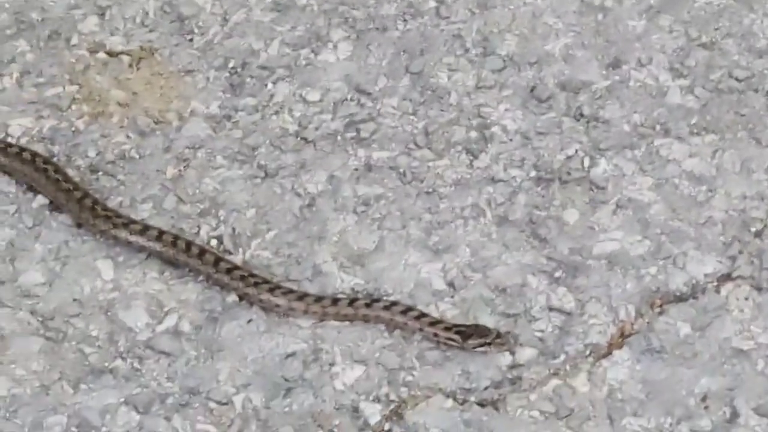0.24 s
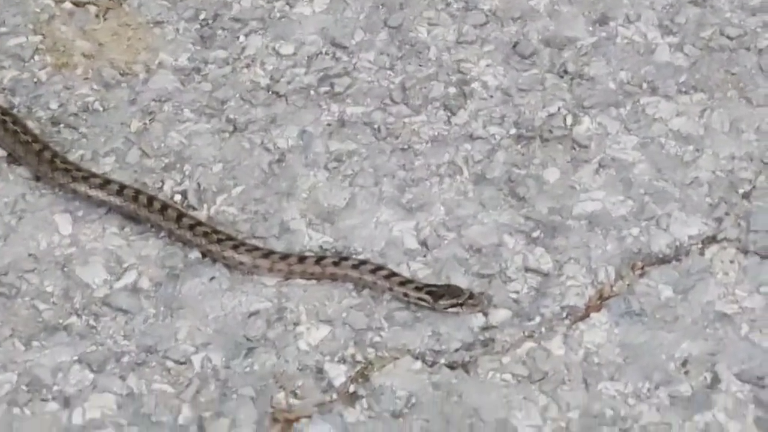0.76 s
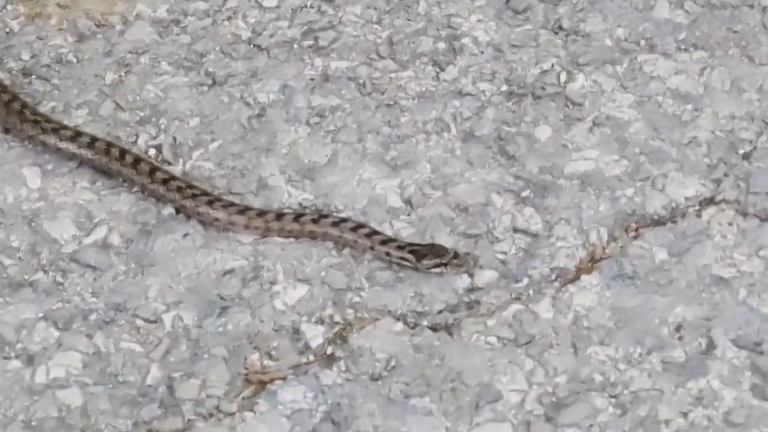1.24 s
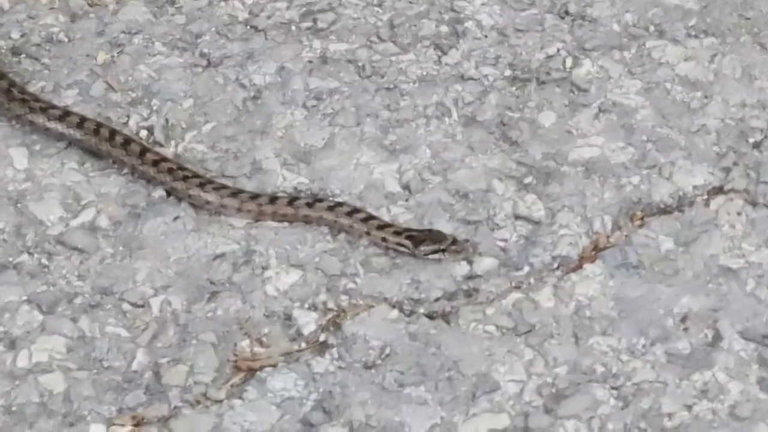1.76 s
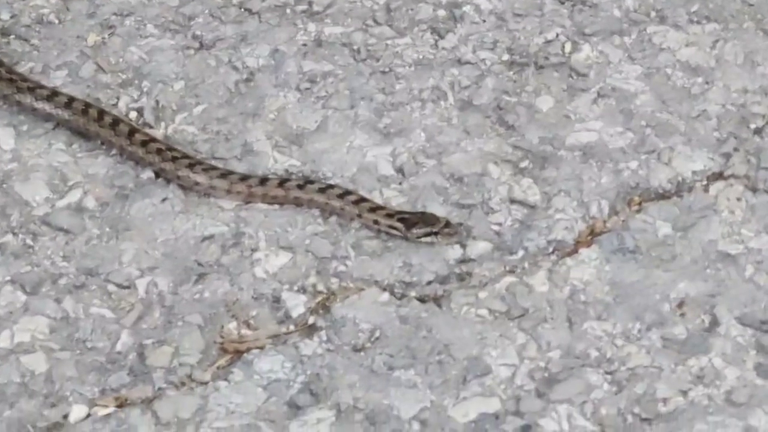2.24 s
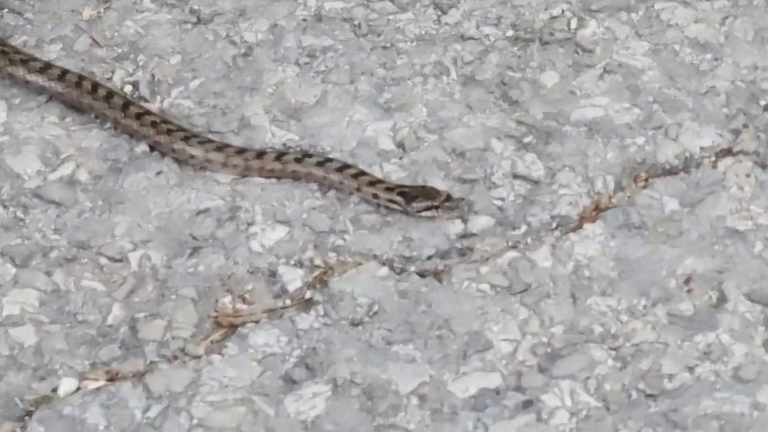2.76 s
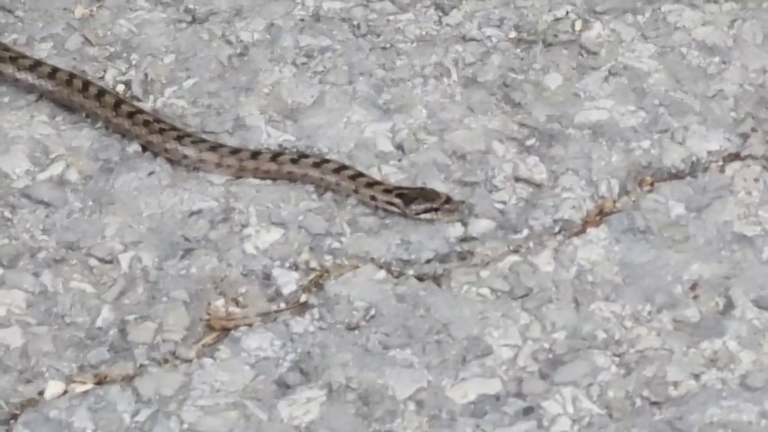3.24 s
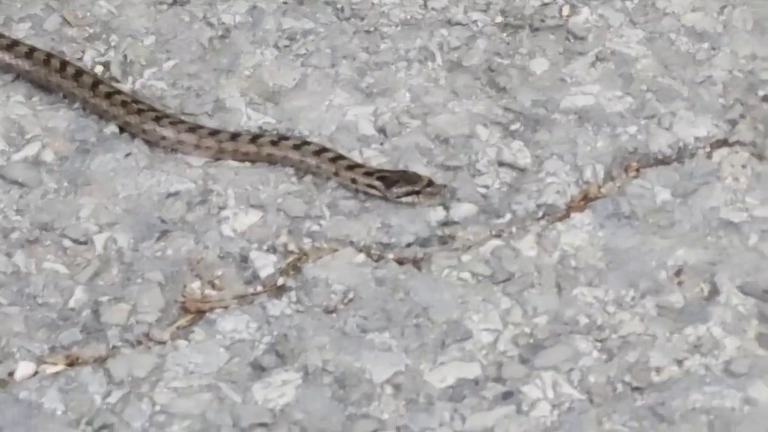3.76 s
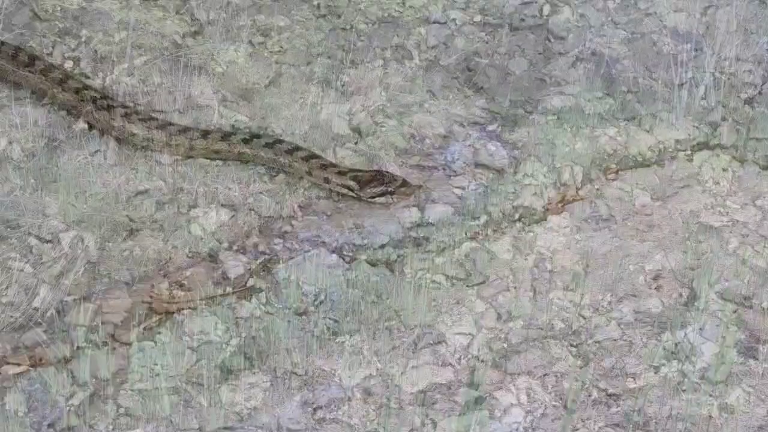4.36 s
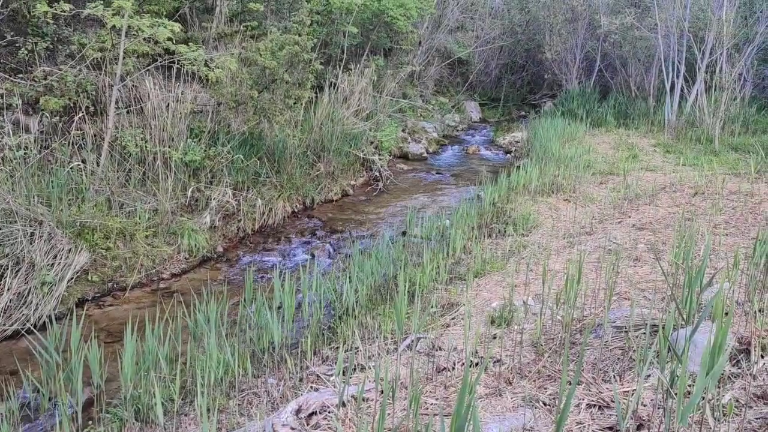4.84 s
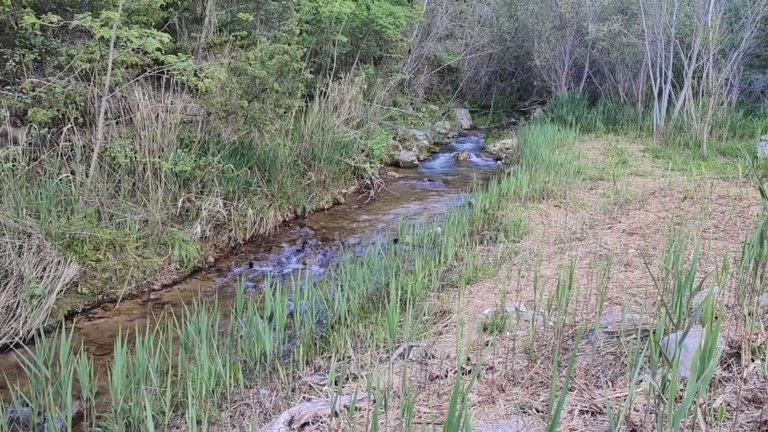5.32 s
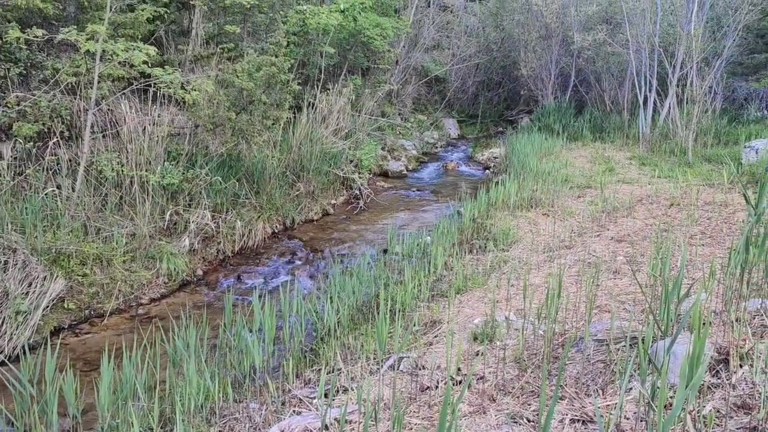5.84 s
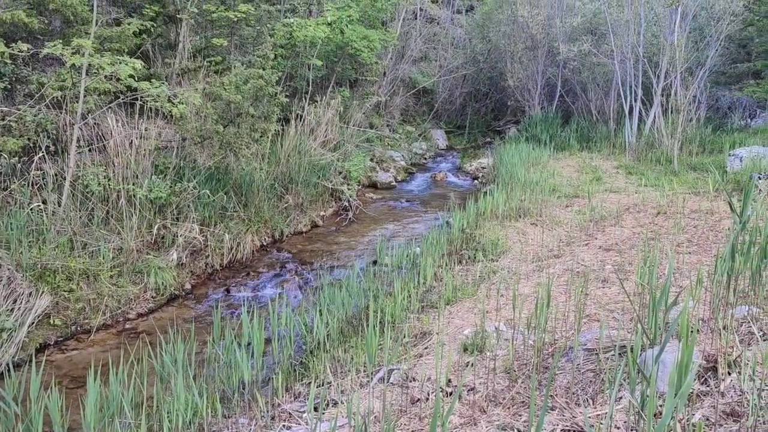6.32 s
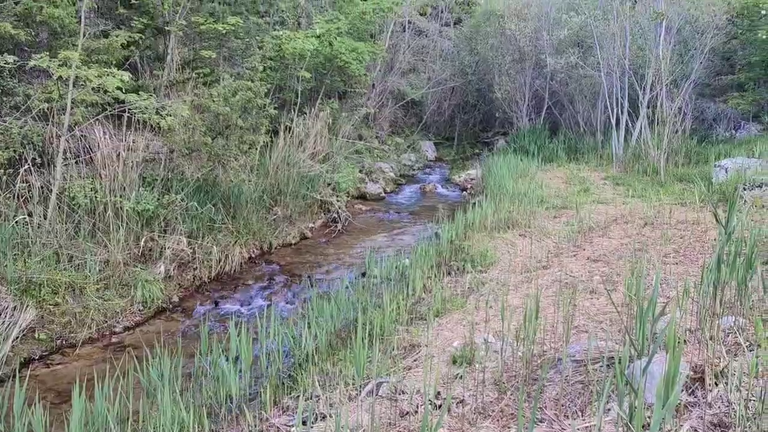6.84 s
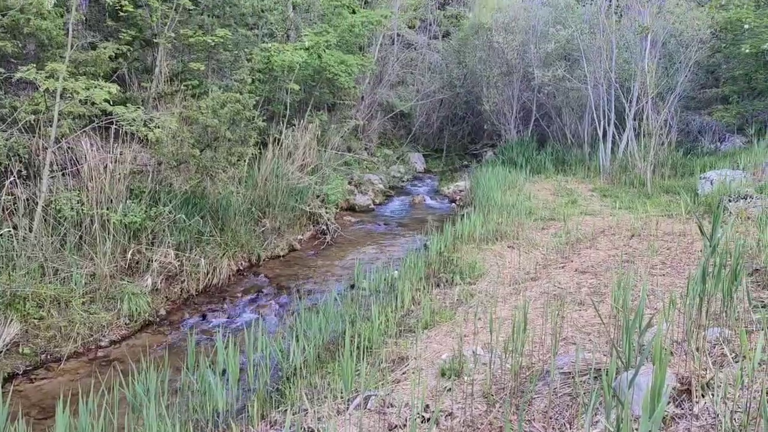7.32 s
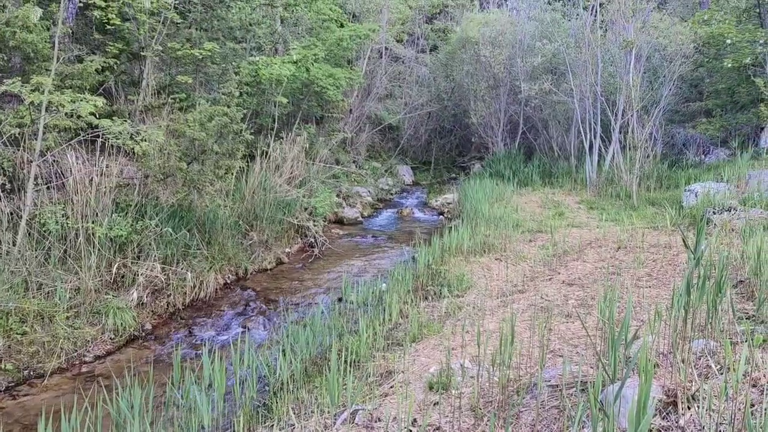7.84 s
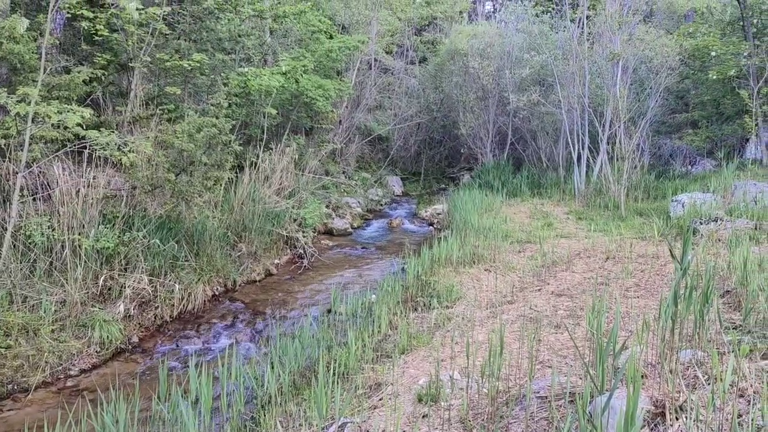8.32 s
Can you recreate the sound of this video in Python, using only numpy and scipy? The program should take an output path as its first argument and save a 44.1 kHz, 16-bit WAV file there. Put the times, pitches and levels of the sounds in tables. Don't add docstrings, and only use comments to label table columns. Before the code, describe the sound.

Outdoors on a hand-held stereo microphone: a dense, bright chorus of whistling and chirping birds, small grip bumps and ticks, quiet air and a barely audible cricket. The chorus recedes to faint pips and soft slurs, crossfading around four and a half seconds into a shallow stream over stones, steady and gurgling. Later, several short clear bird calls come from far off before the water continues alone.

```python
import sys
import numpy as np
from scipy import signal
from scipy.fft import rfft, irfft, next_fast_len
from scipy.io import wavfile
from scipy.ndimage import uniform_filter1d

SR = 44100
rng = np.random.default_rng(int(sys.argv[2]) if len(sys.argv) > 2 else 0)


def volts(x):
    e = np.asarray(x, float) / 20
    return 10 ** e


def materialize(psi):
    bounded = np.clip(np.atleast_2d(psi).T, -1, 1)
    quanta = np.round(bounded * 32767).astype(np.int16)
    wavfile.write(sys.argv[1], SR, quanta)


N = 378819


def in_time(rows):
    s, db = np.transpose(rows)
    return volts(np.interp(np.arange(N) / SR, s, db))


def at_hz(points, hz):
    points = np.array(points)
    return np.interp(np.log(hz + 1), np.log(points[:, 0] + 1), points[:, 1])


def rms_one(x):
    return x / np.sqrt(np.mean(x ** 2) + 1e-20)


def drift(rate_hz):
    every = 40
    r = np.exp(-2 * np.pi * every * rate_hz / SR)
    noise = rng.standard_normal(N // every + 2002)
    slow = signal.lfilter([1], [1, -2 * r, r * r], noise)[2000:]
    return np.interp(np.arange(N) / every, np.arange(len(slow)), rms_one(slow))


def quaver(corner_hz):
    low_pass = signal.butter(4, corner_hz, fs=SR, output="sos")
    return rms_one(signal.sosfilt(low_pass, rng.standard_normal(N)))


def add(track, s, sound):
    i = round(s * SR)
    track[..., i:i + sound.shape[-1]] += sound[..., :N - i]


# pitch_hz, left_lead_rad
PORT_LEAD = [(0, 0), (340, -0.0), (860, 2.1), (1640, 3.3), (2410, 7.7), (3100, 9.1), (3960, 7.5),
             (4740, 9.0), (6200, 7.9), (6720, 8.7), (9390, 18.1), (11100, 21.4), (13900, 19.3),
             (15300, 23.4)]
# pitch_hz, common_share
PORT_LIKENESS = [(250, 0.95), (450, 0.4), (800, 0.62), (2500, 0.09), (5000, 0.69), (9000, 0.02)]


def ports(right, left_own, balance, colour=None, alike=None):
    size = next_fast_len(N + 4096)
    hz = np.arange(size // 2 + 1) * SR / size
    right, left_own = rfft(right, size), rfft(left_own, size)
    alike = np.clip(at_hz(PORT_LIKENESS, hz) if alike is None else alike, 0, 1)
    shifted = np.exp(1j * at_hz(PORT_LEAD, hz)) * right
    left = alike * shifted + np.sqrt(1 - alike ** 2) * left_own
    tilt = volts(at_hz(balance, hz))
    gain = 1 if colour is None else volts(at_hz(colour, hz)) / np.sqrt(1 + tilt ** 2)
    return irfft(np.array([left * tilt, right]) * gain, size)[:, :N]


# time_s, level_db
AIR_LEVEL = [(0, -50.5), (1, -47), (2, -50.5), (3.5, -50.5), (3.9, -55), (4.3, -51.5), (4.8, -84),
             (5.0, -100)]
# pitch_hz, density_db_per_hz
AIR_SPECTRUM = [(25, -25.5), (45, -3), (95, 1), (200, -5), (400, -15.5), (900, -17.5), (1600, -22.5),
                (3000, -16), (6300, -22.5), (8100, -30), (11000, -36.5), (12500, -28), (15600, -32)]
# pitch_hz, left_minus_right_db
OPEN_BALANCE = [(60, -6), (110, -9), (200, -14.5), (380, 4.5), (700, 3.5), (1290, 0.5), (2380, -1.5),
                (4400, -9.5), (8120, -6.5), (15000, -4.5)]


def air():
    right, left = rng.standard_normal((2, N))
    shaped = rms_one(ports(right, left, OPEN_BALANCE, AIR_SPECTRUM))
    return in_time(AIR_LEVEL) * shaped * volts(drift(11.0))


def whistle(t, hz, level_db, edge_s=0.006, overtone_db=-61.5):
    rise = t - t[0] + (t[0] <= 0)
    fall = (t[-1] - t) * 0.78
    edge = np.clip(np.minimum(rise, fall) / edge_s, 0, 1)
    phase = np.cumsum(hz) * 2 * np.pi / SR
    tone = np.sin(phase) + volts(overtone_db) * np.sin(2 * phase) + volts(-56.0) * np.sin(3 * phase)
    return volts(level_db) * np.sin(edge * np.pi / 2) ** 2 * tone


def slurs(kinds, unsteady, flutter_db=2.5):
    out, waver, swell = np.zeros(N), quaver(110.0), quaver(100.0)
    for notes, (settle, change_db, swell_db), dip in kinds:
        for s, length, first_hz, last_hz, level_db in notes:
            t = np.arange(max(s, 0), s + max(length, .006), 1 / SR)
            at, u = (t * SR).astype(int), np.linspace(0, 1, len(t))
            arch = np.sin(np.pi * u)
            glide = np.expm1(-settle * u) / np.expm1(-settle)
            pitch = first_hz + (last_hz - first_hz) * glide
            pitch = pitch * (1 - dip * arch + unsteady * waver[at])
            level = level_db + change_db * u + swell_db * (arch - .5) + flutter_db * swell[at]
            add(out, t[0], whistle(t, pitch, level))
    return out


def level_notes(rows, start_share=1):
    return [(s, length, start_share * hz, hz, db) for s, length, hz, db in rows]


# start_s, length_s, pitch_hz, level_db
HIGH_HOOKS = [
    (.945, 0.057, 4188, -21),
    (1.295, 0.069, 4250, -20),
    (1.465, 0.078, 4148, -23),
    (1.829, 0.064, 4200, -23),
    (2.0, .075, 4130, -24),
    (2.375, 0.048, 4190, -20),
    (2.555, 0.085, 4136, -23.5),
    (2.945, 0.13, 4205, -29),
]
# start_s, length_s, pitch_hz, level_db
HIGH_HOLDS = [(0, 0.014, 4775, -15), (0, 0.044, 7240, -30), (.2, 0.013, 6480, -25), (.2, 0.1, 5543, -19),
              (.56, 0.076, 4858, -15.5), (1.15, 0.04, 6356, -16), (1.705, 0.12, 6637, -24.5),
              (1.8, 0.064, 6590, -26.5), (2.245, .085, 6580, -26), (2.305, 0.025, 5450, -26),
              (2.63, 0.024, 7970, -52.5), (2.815, 0.095, 6540, -31)]
# start_s, length_s, first_pitch_hz, last_pitch_hz, level_db
SAGS = [
    (1.06, 0.069, 6650, 6314, -19.5),
    (1.6, 0.12, 6580, 6305, -25),
    (2.15, .07, 6730, 6264, -19),
    (2.695, 0.087, 6585, 6357, -21),
]
# start_s, length_s, first_pitch_hz, last_pitch_hz, level_db
HIGH_FALLS = [
    (.24, 0.013, 5500, 4570, -32.5),
    (.422, 0.101, 4850, 4750, -16.5),
    (1.865, 0.048, 5266, 5185, -25.5),
    (2.092, 0.061, 5330, 5000, -31),
    (4.49, 0.049, 5490, 5100, -41.5),
]


def high_singers():
    pulse_hz, hook_from = 212, .915
    sides = []
    for s, length, hz, db in HIGH_HOOKS:
        sides.append((s, length, hz + pulse_hz, db - 20.5))
        sides.append((s, length, hz - pulse_hz, db - 13.5))
    return slurs([(level_notes(HIGH_HOOKS + sides, hook_from), (11., 1.8, 0.73), 0),
                  (level_notes(HIGH_HOLDS), (.3, -1.4, 0.59), 0.01594),
                  (SAGS, (2.5, -1.5, 1.6), 0),
                  (HIGH_FALLS, (1.6, -8.5, 7.5), 0)], unsteady=0.0022, flutter_db=2.2)


# start_s, length_s, first_pitch_hz, last_pitch_hz, level_db
FALLING = [(.067, .023, 3730, 3791, -36), (.221, 0.058, 4001, 3540, -38), (.301, 0.096, 2227, 2120, -29),
           (.374, .056, 5190, 4780, -20.5), (.731, 0.11, 3781, 3615, -34), (1.736, .031, 3751, 3530, -54),
           (2.093, .081, 2585, 2183, -34.5), (2.831, 0.077, 4014, 3410, -22),
           (2.886, .023, 3450, 3010, -29.5), (3.181, .031, 3781, 3501, -37), (4.206, .051, 1961, 1804, -52),
           (4.406, 0.032, 4120, 3730, -44)]
DROPS = [
    (1.272, 0.041, 2820, 1680, -23.5),
    (1.445, 0.039, 2870, 1640, -21),
    (1.635, 0.045, 2880, 1650, -24),
    (1.88, 0.1, 2583, 2130, -25.5),
    (4.282, 0.037, 1820, 1170, -32),
    (4.592, 0.065, 1900, 1360, -35),
]
CLIMBS = [(.07, 0.086, 1520, 1796, -40), (.145, 0.046, 1760, 1980, -35), (.195, 0.043, 1965, 2116, -29.5),
          (.38, 0.15, 2178, 2354, -27), (.675, 0.03, 2990, 3260, -48), (2.45, 0.037, 2450, 2710, -36),
          (2.476, 0.052, 2700, 3400, -28), (2.915, 0.026, 3380, 4000, -27.5), (2.305, .03, 3360, 3440, -48),
          (2.32, 0.02, 3750, 3620, -46.5), (4.245, 0.22, 2350, 2924, -48.5),
          (4.33, 0.059, 3460, 3560, -44.5)]
SWOOPS = [
    (.55, 0.077, 2392, 2575, -31),
    (3.125, 0.057, 3966, 3854, -21),
    (4.49, 0.0516, 2833, 2582, -31),
]
SLIDES = [
    (1.078, 0.071, 3990, 3077, -27.5),
    (3.208, 0.017, 2220, 1990, -52),
    (3.335, 0.061, 3475, 3014, -26.5),
    (3.702, 0.031, 2270, 1620, -57.5),
    (4.025, 0.054, 3550, 2590, -36.5),
    (4.172, 0.038, 2260, 1916, -42),
    (4.425, 0.11, 3030, 2690, -41),
    (4.562, 0.03, 2200, 2010, -37.5),
]
FLICKS = [
    (.352, 0.1, 3020, 3453, -31.5),
    (2.345, 0.072, 2880, 3486, -28),
    (2.75, .075, 3260, 2456, -29.5),
]
# start_s, length_s, pitch_hz, level_db
LOW_HOLDS = [(.01, 0.033, 1950, -55), (.033, 0.017, 2140, -45), (.158, .045, 3160, -52),
             (2.515, .07, 3408, -24.5), (2.35, 0.056, 2540, -47.5), (1.235, 0.033, 2800, -27),
             (1.405, 0.046, 2810, -37), (1.605, 0.043, 2767, -29), (2.965, 0.094, 2510, -30.5),
             (3.42, 0.054, 3040, -24.5), (3.635, 0.02, 2544, -31.5), (3.965, 0.038, 2190, -61.5),
             (3.98, 0.018, 1910, -59), (4.005, 0.027, 3560, -51), (4.082, 0.055, 2176, -49.5),
             (4.1, 0.044, 1755, -58), (4.252, 0.053, 1762, -38.5), (4.37, 0.039, 1813, -47),
             (4.7, 0.062, 2580, -46), (4.585, 0.041, 2680, -40), (4.662, 0.018, 2700, -48),
             (4.455, 0.1, 3640, -40),
             (1.3, 0.11, 2830, -46), (1.49, 0.078, 2815, -40), (1.67, 0.15, 2800, -42.5),
           (3.07, 0.034, 2400, -37.5), (.02, 0.11, 4760, -35.5), (.17, .2, 4750, -40),
           (4.085, 0.036, 2650, -49), (4.31, 0.06, 1780, -47), (.65, .1, 2620, -45)]


def low_singers():
    return slurs([(FALLING, (1.8, -0.29, 1.8), 0),
                  (DROPS, (1.1, -30, 2.8), 0),
                  (CLIMBS, (1.2, 4.6, 0.87), 0),
                  (level_notes(LOW_HOLDS), (.3, -0.47, 6.8), 0),
                  (SWOOPS, (3.5, 5.5, 2.4), 0),
                  (SLIDES, (1.5, 2.2, 3.1), 0),
                  (FLICKS, (9.52, 2.2, 1.4), 0)], unsteady=0.003, flutter_db=2.2)


# start_s, length_s, first_pitch_hz, last_pitch_hz, level_db
TRILLS = [(.039, 0.026, 6810, 6700, -23), (.086, 0.028, 4190, 4230, -17), (.647, 0.032, 4980, 7520, -23.5),
          (.75, 0.027, 3900, 4250, -24), (.775, 0.069, 4246, 4306, -18.5), (.8, 0.11, 3610, 3654, -28.5),
          (.1, 0.114, 3630, 3506, -27.5), (.868, 0.081, 5105, 5340, -22.5), (1.18, .02, 4900, 5390, -25),
          (1.2, 0.067, 5600, 5710, -30.5), (.78, 0.12, 2580, 2910, -32), (.8, 0.12, 2265, 2460, -32.5),
          (1.19, 0.061, 11030, 11670, -52.5), (1.798, 0.05, 7440, 7440, -36),
          (1.848, 0.024, 7740, 5000, -19), (2.026, 0.037, 6330, 7000, -24.5),
          (2.037, .04, 7580, 7660, -38.5), (1.13, .12, 6930, 7050, -43), (2.067, 0.027, 7540, 5090, -18.5),
          (2.113, 0.013, 6660, 5880, -22), (2.616, 0.019, 7270, 6500, -46.5),
          (2.622, 0.046, 5920, 5605, -26.5)]
RASPS = [
    (.43, 0.069, 6220, 5260, -28),
    (.635, 0.02, 5740, 9150, -30.5),
    (.683, 0.056, 6030, 5120, -24),
    (.278, 0.013, 3480, 2720, -28),
    (1.205, 0.068, 4400, 3830, -30.5),
    (1.879, 0.031, 6900, 6060, -39),
    (3.19, .03, 3450, 2870, -32.5),
    (4.37, 0.094, 3700, 3960, -43),
]


def buzzes():
    out = np.zeros(N)
    waver = 1.4 * np.tanh(quaver(300.))
    for chips, warble_share in (TRILLS, .035), (RASPS, .09):
        for s, length, first_hz, last_hz, level_db in chips:
            t = np.arange(s, s + length, 1 / SR)
            glide = np.linspace(first_hz, last_hz, len(t))
            pitch = glide * (1 + warble_share * waver[(t * SR).astype(int)])
            add(out, s, whistle(t, pitch, level_db, edge_s=0.0071, overtone_db=-39.5))
    return out


# pitch_hz, left_minus_right_db
BIRD_BALANCE = [(1300, -5.5), (2400, -1), (4400, -15.5), (8000, -21)]


def wood(x, direct_db, t60_s):
    near_t60_s, near_db, far_db = 0.28, -1, 1
    t = np.arange(SR) / SR
    near = volts(-60 * t / near_t60_s) * volts(near_db) / np.sqrt(near_t60_s)
    far = volts(-60 * t / t60_s) * volts(far_db) / np.sqrt(t60_s) * np.clip(t / 0.0016, 0, 1)
    far *= volts(-13. * np.clip((t - .16) / 0.7, 0, 1))
    scatter = rng.standard_normal((2, SR)) * np.hypot(near, far) * np.sqrt(2 * np.log(1000) / SR)
    low = signal.sosfiltfilt(signal.butter(4, 2700, fs=SR, output="sos"), scatter)
    scatter = scatter + low * (volts(-1.5 - 30 * t) - 1)
    right, left = signal.fftconvolve(x[None], scatter, axes=1)[:, :N]
    return ports(volts(direct_db) * x + right, left, BIRD_BALANCE, alike=0.12)


def insect():
    first_s, every_s, tick_s, pitch_hz = .068, .2659, .012, 14950
    level_db, left_db = -57, -15.5
    out, t = np.zeros((2, N)), np.arange(0, tick_s, 1 / SR)
    tick = np.sin(np.pi * t / tick_s) ** 2 * np.sin(2 * np.pi * pitch_hz * t)
    for k, (late, db) in enumerate(rng.standard_normal((15, 2))):
        sound = volts(level_db + 2 * db) * tick * volts([[left_db], [0]])
        add(out, first_s + k * every_s + .003 * late, sound)
    return out


def soft_blow(hz, cycles):
    t = np.arange(round(.06 * SR)) / SR
    u = t * hz / cycles
    return u ** 2 * np.exp(2 - 2 * u) * np.sin(2 * np.pi * hz * t)


# start_s, shell_peak_db, shell_pitch_hz, hollow_db
KNOCKS = [(0.495, -40, 1210, -57), (0.631, -62, 875, -50), (0.786, -49.5, 670, -68),
          (0.873, -33.5, 883, -66), (1.064, -44.5, 1180, -74), (1.139, -34, 667, -61),
          (1.179, -45, 620, -56), (1.334, -47, 965, -52), (1.498, -26, 960, -52),
          (1.608, -46.5, 1140, -49.5), (1.8, -48.5, 960, -67), (1.827, -77, 830, -51.5),
          (2.015, -56.5, 1100, -47), (2.102, -50, 950, -72), (2.168, -55, 990, -46.5),
          (2.241, -48.5, 654, -55), (2.491, -52, 986, -52.5), (2.575, -37.5, 666, -43.5),
          (2.621, -42.5, 750, -51), (2.672, -52, 610, -54), (2.732, -51, 624, -45.5),
          (2.947, -42, 800, -53), (3.034, -42, 1070, -60), (3.111, -58, 820, -51), (3.233, -41, 700, -55),
          (3.393, -47.5, 580, -50.5), (3.503, -42.5, 820, -55), (3.546, -42.5, 705, -66),
          (3.728, -52, 855, -52.5), (3.844, -50.5, 830, -59)]
# start_s, peak_db, pitch_hz
THUMPS = [
    (0.496, -34.5, 120),
    (0.639, -31.5, 131),
    (0.97, -38, 258),
]
# start_s, peak_db, pitch_hz
TICKS = [
    (0.099, -14, 2200),
    (0.101, -17, 3400),
    (.632, -25.5, 6360),
    (0.9022, -15, 6500),
    (1.342, -38, 8340),
    (1.528, -28.5, 5600),
    (2.579, -41, 1640),
    (3.235, -59, 1530),
]


def grip():
    out = np.zeros((2, N))
    for s, shell_db, hz, hollow_db in KNOCKS:
        shell = soft_blow(hz, cycles=2.1) + volts(1.5) * soft_blow(1.43 * hz, cycles=0.67)
        hollow = soft_blow(364, cycles=1.45)
        add(out, s - .001, volts(shell_db) * shell * volts([[3], [-6]]))
        add(out, s - .001, volts(hollow_db + 6.5) * hollow * volts([[.6], [-.6]]))
    for s, db, hz in THUMPS:
        add(out, s, volts(db) * soft_blow(hz, cycles=0.26))
    for s, db, hz in TICKS:
        add(out, s, volts(db) * soft_blow(hz, cycles=0.76 + hz / 4000) * volts([[-1.5], [1.5]]))
    return out


FAR_MOTION = (1.68, -1.4, 2.2)   # settle, change_db, swell_db of any distant call
# start_s, length_s, first_pitch_hz, last_pitch_hz, level_db
LULL_CALLS = [
    (3.785, 0.14, 1480, 1746, -66),
    (3.85, 0.022, 5830, 5800, -61),
    (3.88, 0.019, 5560, 5440, -60),
    (3.895, 0.019, 5000, 4750, -61),
    (3.92, 0.019, 6100, 6000, -57),
    (4.035, 0.013, 6800, 5450, -56),
]


def lull_calls():
    return wood(slurs([(LULL_CALLS, FAR_MOTION, 0)], unsteady=.002), direct_db=10.0, t60_s=0.28)


def ring(clicks, hz, t60):
    r, w = volts(-60 / (t60 * SR)), 2 * np.pi * hz / SR
    return signal.lfilter([0, np.sin(w)], [1, -2 * r * np.cos(w), r * r], clicks + 1e-18)


def gurgles(per_s, cycles):
    sizes = volts(np.minimum(rng.exponential(1, N), 4)) * rng.choice([-1, 1], N)
    born = rng.random(N) < per_s * volts(3. * drift(5.)) / SR
    pitches, dealt = np.geomspace(400, 4000, 16), rng.integers(0, 16, N)
    out = np.zeros(N)
    for k, hz in enumerate(pitches):
        out += ring(sizes * born * (dealt == k), hz, cycles / hz)
    return rms_one(out)


# time_s, level_db
FLOW = [(4.05, -85.5), (4.26, -50), (4.45, -42.5), (4.8, -38), (5.1, -36), (6, -36), (7, -35), (8, -35),
        (8.59, -35)]
# pitch_hz, density_db_per_hz
BROOK_SPECTRUM = [(24, -54), (40, -15), (109, 0.5), (193, -9), (407, -15.5), (688, -7), (883, -9.5),
                  (1220, -8), (1610, -13.5), (2280, -11), (3070, -15), (6500, -12.5), (8990, -26),
                  (13400, -28.5), (15600, -32.5)]


def brook():
    flicker_db = 0.69 * np.array([drift(33.0), drift(36.0)]) + .5 * drift(5.4)
    rush = rng.standard_normal((2, N)) * volts(flicker_db)
    rush[0] += volts(-14.5) * gurgles(per_s=400.0, cycles=9.0)
    rush[0] += volts(-14.5) * gurgles(per_s=60.0, cycles=28.0)
    return in_time(FLOW) * rms_one(ports(*rush, OPEN_BALANCE, BROOK_SPECTRUM))


# start_s, length_s, first_pitch_hz, last_pitch_hz, level_db
FAR_CALLS = [
    (6.665, 0.04, 3600, 3720, -38),
    (6.695, 0.042, 3880, 3640, -36),
    (6.92, 0.058, 3140, 3300, -39),
    (6.955, 0.036, 3480, 3600, -37),
    (7.1, .04, 3530, 3080, -47),
    (7.16, 0.049, 2950, 2970, -37),
    (7.35, 0.12, 3550, 3130, -36),
    (7.74, .04, 2400, 2360, -38),
]


def far_calls():
    return slurs([(FAR_CALLS, FAR_MOTION, 0)], unsteady=.003, flutter_db=.8) * volts([[-13.5], [-7]])


def scene():
    low = wood(volts(3.0) * low_singers(), direct_db=0.5, t60_s=0.99)
    high = wood(high_singers(), direct_db=-6.5, t60_s=0.98)
    rough = wood(buzzes(), direct_db=-3.0, t60_s=0.95)
    low, high = (part * volts(1.3 * quaver(35)) for part in (low, high))
    birds = low + high + rough + volts(-3.0) * lull_calls()
    dissolve_from_s, dissolve_db_per_s = 4.53, -24
    fade = volts(dissolve_db_per_s * np.maximum(np.arange(N) / SR - dissolve_from_s, 0))
    return birds * fade + insect() + grip() + air() + brook() + far_calls()


def spectral_gate(x):
    hz, _, frames = signal.stft(x, SR, nperseg=2048)
    power = uniform_filter1d(np.abs(frames) ** 2, size=4, axis=1)
    band = uniform_filter1d(power, size=10, axis=1)
    skirt = uniform_filter1d(power, size=round(800 * 4096 / SR), axis=1)
    skirt = skirt * volts(2 * -30.5) * (hz[:, None] > 1200)
    loud = power[:, (hz > 5700) & (hz < 8200)].mean(axis=1, keepdims=True)
    gated = (hz > 7300) & (hz < 11700)
    reach = volts(2 * (-20 - 5.0 * (hz - 7300) / 1e3)) * gated
    kept = (power > loud * reach[:, None]) * (band > skirt)
    return signal.istft(frames * kept, SR, nperseg=2048)[1][:, :N]


def top_cut(x):
    return signal.sosfilt(signal.butter(12, 15720, fs=SR, output="sos"), x)


def record(dry):
    mid = (dry[0] + dry[1]) / 2
    high_pass = signal.butter(6, 394, "high", fs=SR, output="sos")
    side = signal.sosfiltfilt(high_pass, (dry[0] - dry[1]) / 2)
    mix = spectral_gate(np.array([mid + side, mid - side]))
    return top_cut(mix)


dry = scene()
out = record(dry)
materialize(out)
```